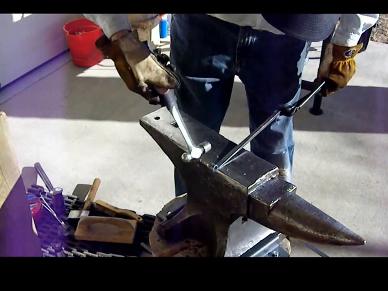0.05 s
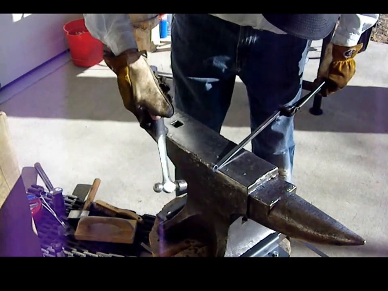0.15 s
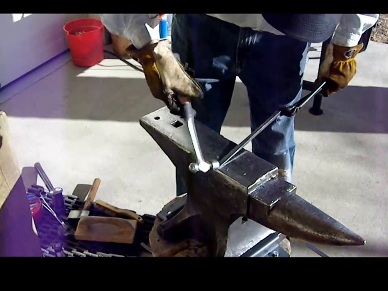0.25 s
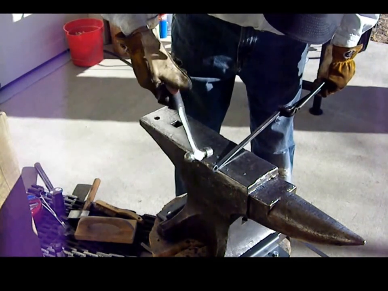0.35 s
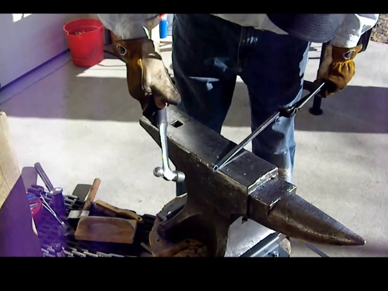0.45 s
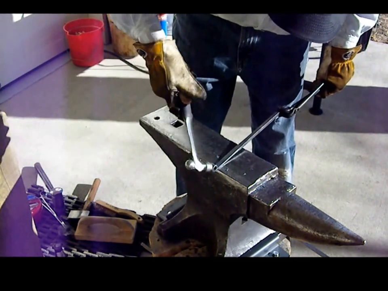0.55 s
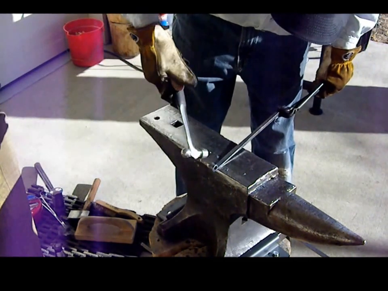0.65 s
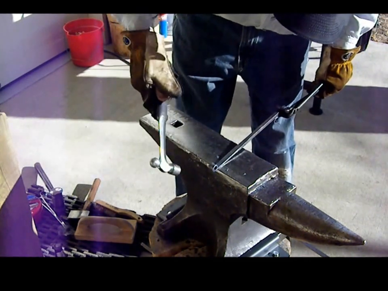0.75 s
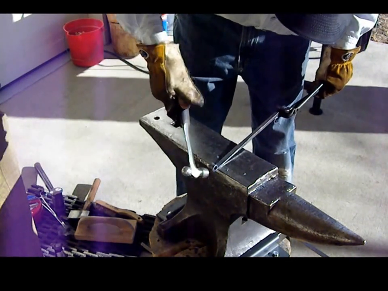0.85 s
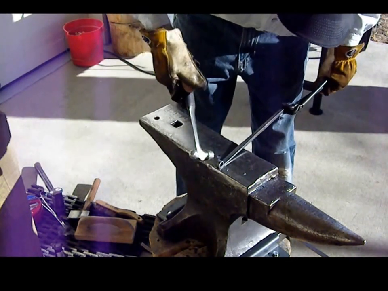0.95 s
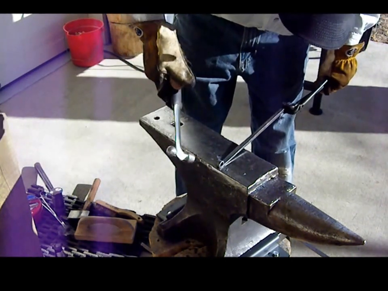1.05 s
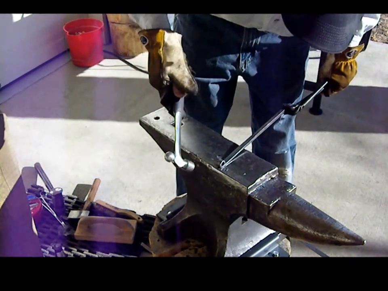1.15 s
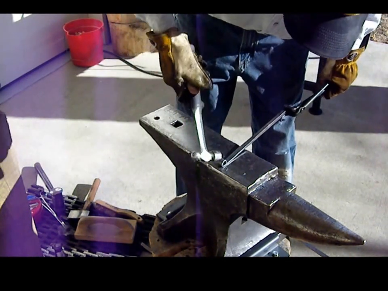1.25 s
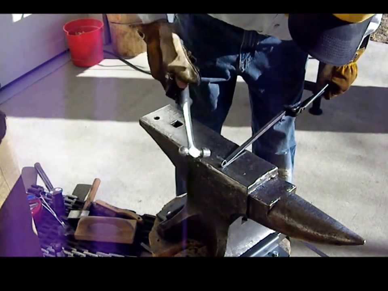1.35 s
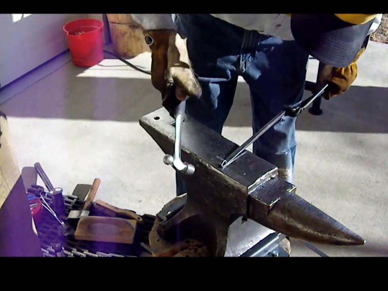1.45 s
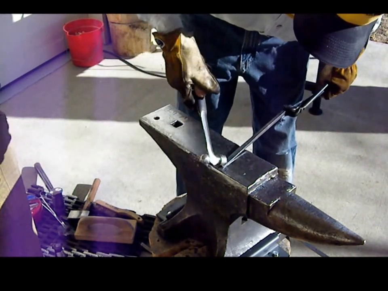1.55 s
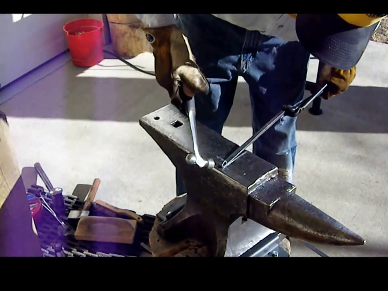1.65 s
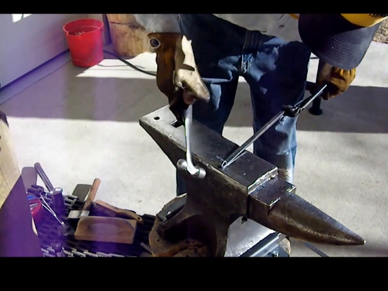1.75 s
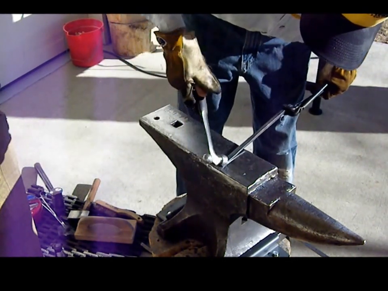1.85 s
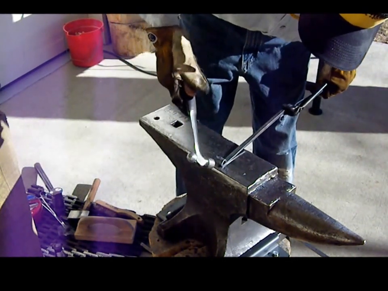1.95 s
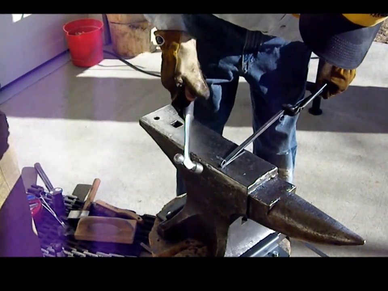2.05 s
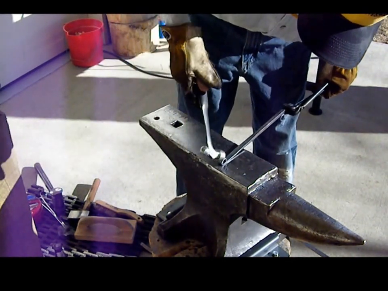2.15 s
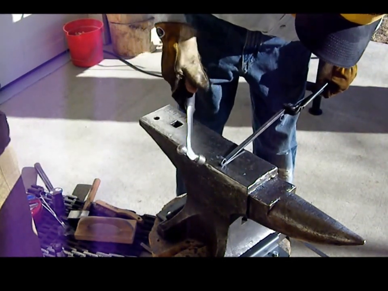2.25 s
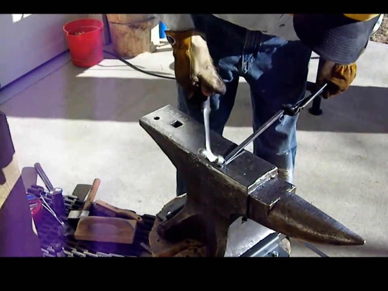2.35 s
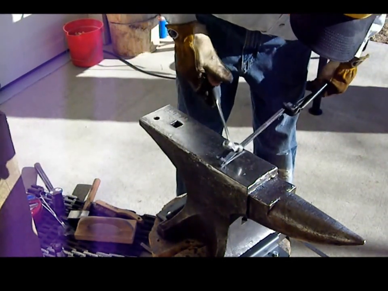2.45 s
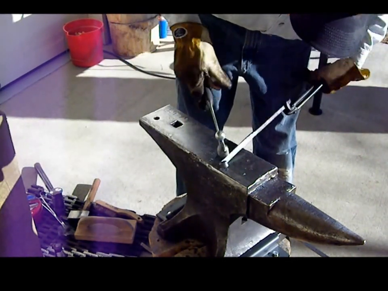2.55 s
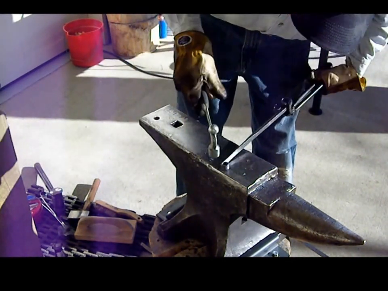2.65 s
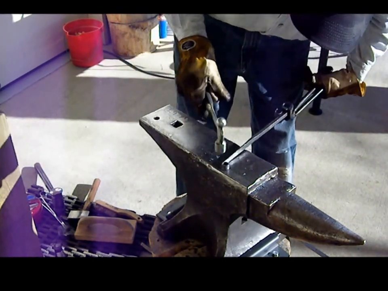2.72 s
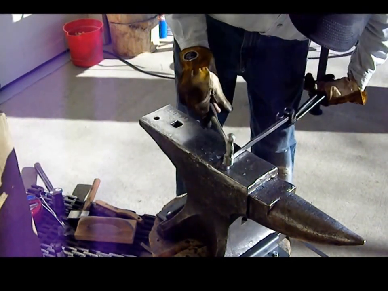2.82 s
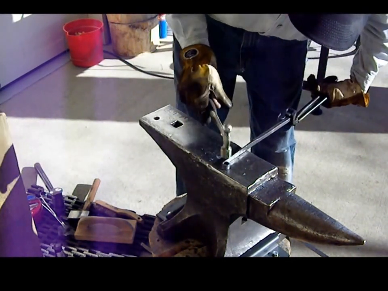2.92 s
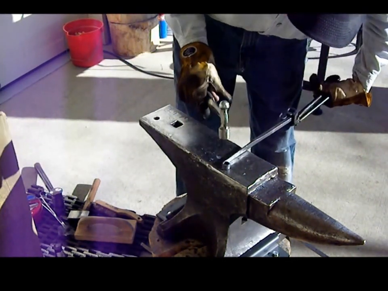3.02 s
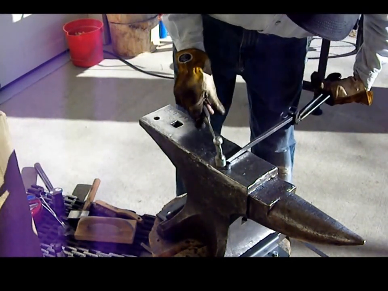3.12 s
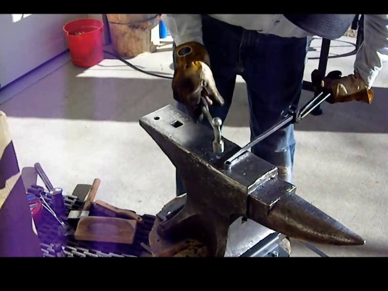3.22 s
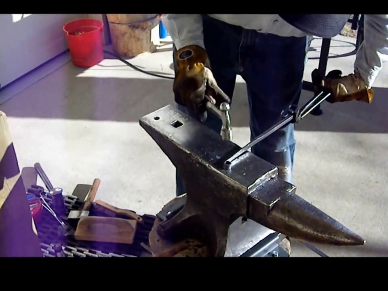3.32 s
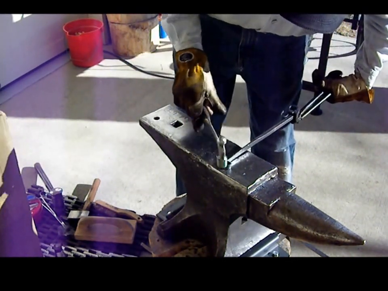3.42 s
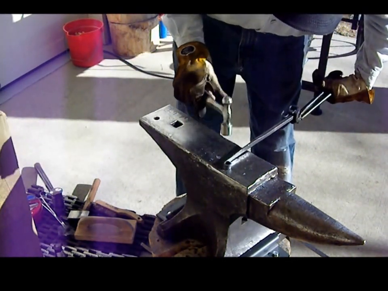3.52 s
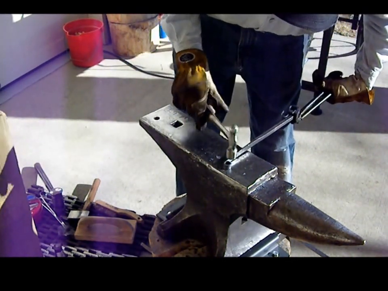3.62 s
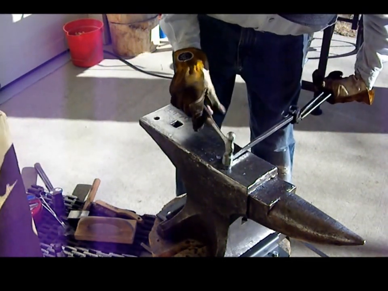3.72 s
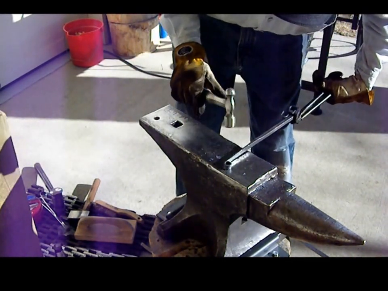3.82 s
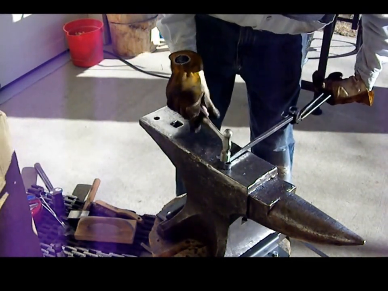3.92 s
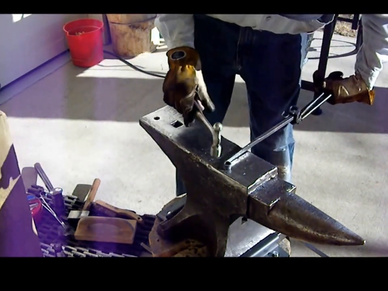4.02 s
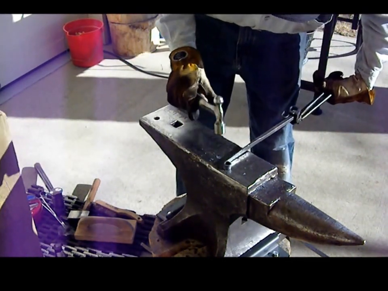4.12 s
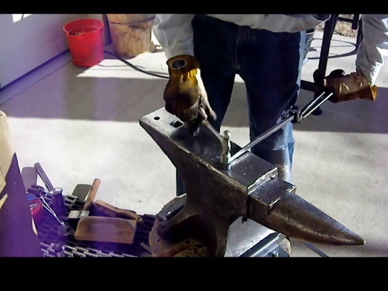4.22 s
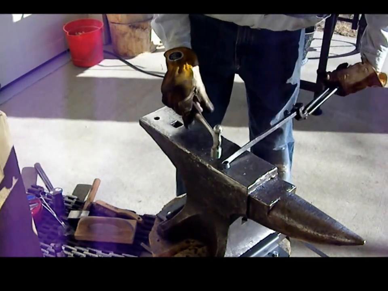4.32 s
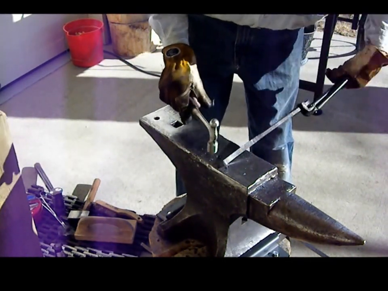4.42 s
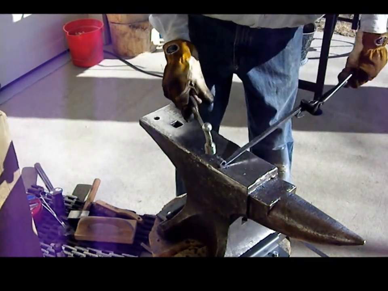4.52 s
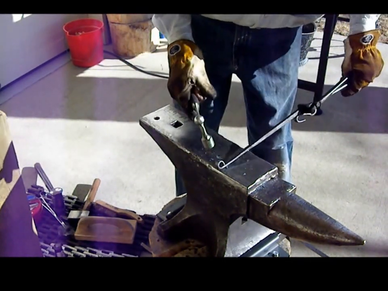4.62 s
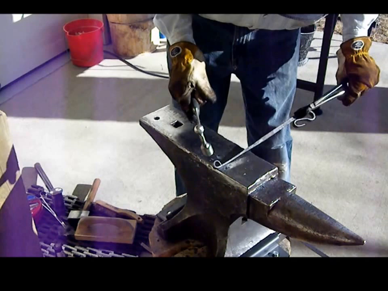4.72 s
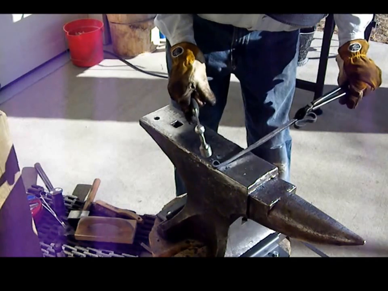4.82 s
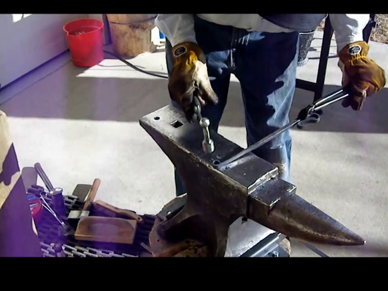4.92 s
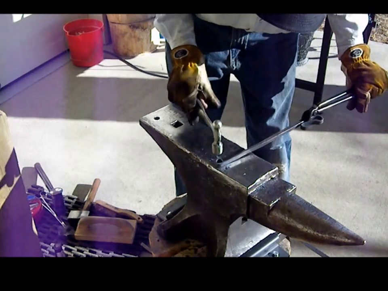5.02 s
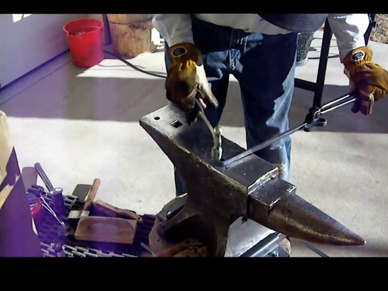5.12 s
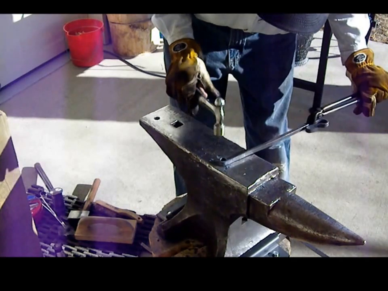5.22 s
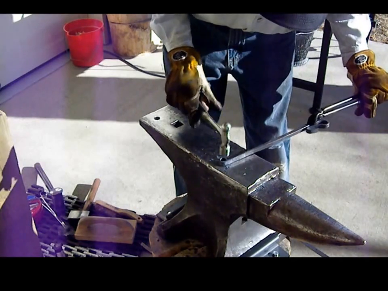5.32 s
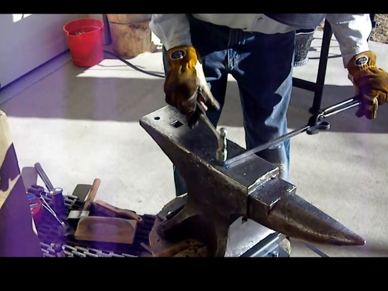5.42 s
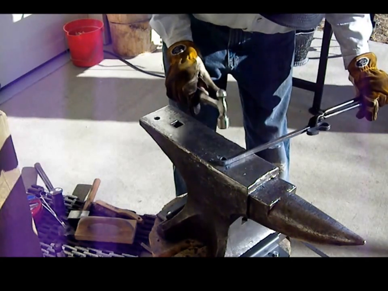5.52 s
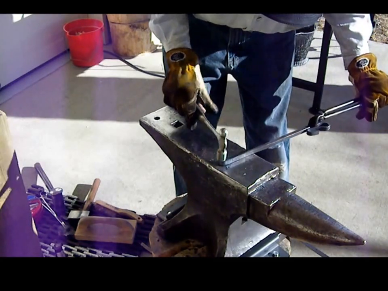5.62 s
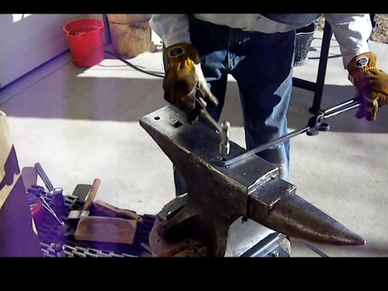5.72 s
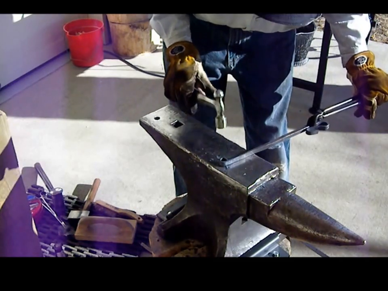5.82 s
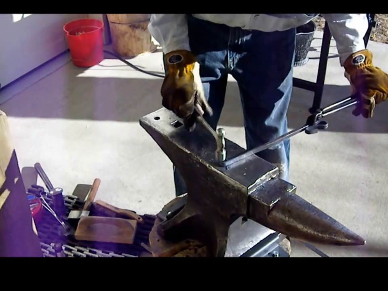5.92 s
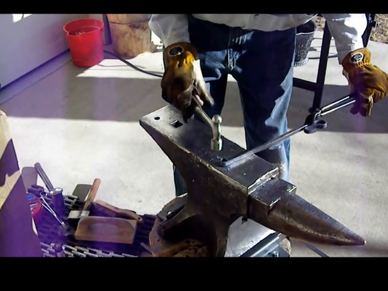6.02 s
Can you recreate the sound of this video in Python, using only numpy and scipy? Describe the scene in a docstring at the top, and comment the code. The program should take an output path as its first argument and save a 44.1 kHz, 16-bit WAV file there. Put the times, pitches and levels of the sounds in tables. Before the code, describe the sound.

A blow's ringing tail opens the sound, then a hand hammer pounds a steel bar on an anvil, close up, roughly every 0.3 seconds from 0.25 to 2.4. Each hit is a loud, hard crack with a brief metallic ping, varying from cushioned and dull to brighter and ringing. A light bouncing knock follows the blow at 0.9, and short bass thumps from microphone overload colour hits near 0.9, 1.2 and 5.4. Around 2.6 to 2.8 the bar shifts with small scratchy clicks. From 2.9 to 4.2 six blows fall, mostly more direct, with clear high anvil ringing. A pause follows with faint scraping near 4.6 and 4.9. A weak tap at 5.1 restarts the run, then strong blows at 5.4, 5.65 and 5.9, with a tiny bounce at 5.7. The concrete workshop gives a short dense echo; a soft forge rush continues throughout.

```python
"""A hand hammer flattens the end of a steel bar on an anvil, about three blows a second, with two light secondary
knocks. Each impact is a noise crack plus decaying sines for hammer head, stand and anvil; the more direct the
blow, the louder the anvil rings. A few strikes overload the microphone lopsidedly, heard as a short bass thump,
made as a damped sine. A concrete workshop echoes by convolution, a forge rushes softly as filtered noise, and
between runs the bar shifts in short bursts of noise. The close microphone saturates on its peaks."""
import sys
import numpy as np
from scipy import signal
from scipy.fft import rfft, irfft, next_fast_len
from scipy.io import wavfile
from scipy.ndimage import uniform_filter1d

SR = 44100
rng = np.random.default_rng(int(sys.argv[2]) if len(sys.argv) > 2 else 0)


def pcm_store(signal):
    """Save signal as 16-bit PCM."""
    levels = np.round(np.clip(np.atleast_2d(signal), -1, 1) * 32767)
    wavfile.write(sys.argv[1], SR, levels.astype(np.int16).T)


N = 267687
LEAD_S = 0.2  # time computed ahead of the first audible sample


def undb(db):
    """Amplitude ratio of a level: 20 dB for each factor of ten."""
    return 10 ** (np.asarray(db) / 20)


def unit(x):
    """Normalisation to an rms value of 1."""
    return x / np.sqrt(np.mean(x ** 2))


def fade(t, t60):
    """Exponential decay of a damped system, 60 dB down after t60."""
    return np.exp(-np.log(1000) * t / t60)


def along(points, hz, column=1):
    """Spectrum read from a table by linear interpolation on a log-frequency axis."""
    points = np.array(points)
    return np.interp(np.log(hz + 1), np.log(points[:, 0]), points[:, column])


def shaped(x, db_at):
    """Minimum-phase filtering: folding the cepstrum makes the gain db_at(Hz) causal."""
    size = next_fast_len(len(x) + 2048, True) // 2 * 2
    bins = np.fft.rfftfreq(size, 1 / SR)
    cepstrum = irfft(np.log(undb(db_at(bins))))
    cepstrum[1:size // 2] *= 2
    cepstrum[size // 2 + 1:] = 0
    response = np.exp(rfft(cepstrum))
    return irfft(rfft(x, size) * response)[:len(x)]


def ring(modes, t):
    """Modal superposition: a sum of damped sines from rows (f/Hz, level/dB, t60/s)."""
    return sum(undb(db) * fade(t, t60) * np.sin(2 * np.pi * hz * t) for hz, db, t60 in modes)


def add(track, s, sound):
    """Linear superposition of a sound on a track that begins LEAD_S early."""
    i = max(int((s + LEAD_S) * SR), 0)
    track[i:i + len(sound)] += sound[:len(track) - i]


def low_pass(x, hz):
    """Steep elliptic low-pass: passband ripple traded for a sharp cutoff."""
    return signal.sosfilt(signal.ellip(10, 0.2, 70, hz, fs=SR, output="sos"), x)


def crack(treble_db, hump_hz, hump_db, t60=0.02, snap=2.25, gain_db=25, hump_octaves=0.35):
    """Broadband impact: one hard snap, then milliseconds of crushed scale and chattering steel as noise."""
    # colour of the contact: (f/Hz, relative level/dB)
    contact_colour = [(50, -53.5), (140, -34), (215, -9.5), (480, -15), (700, -7), (1200, -16.5),
                      (2100, -13.5), (2900, -14.5), (4500, -11), (5600, -3.5), (7200, -2), (9400, -6.5),
                      (11800, -12), (13800, -6), (15300, -15)]
    t = np.arange(2048) / SR
    burst = rng.standard_normal(len(t)) * fade(t, t60)
    burst[0] = snap
    # level out the noise burst so that the colour below alone sets its spectrum
    power = np.abs(rfft(burst)) ** 2
    uneven_db = 10 * np.log10(uniform_filter1d(power, size=15))
    bins = np.fft.rfftfreq(len(t), 1 / SR)
    treble_share = along([(6500, 0), (10000, 1)], bins)
    colour_db = along(contact_colour, bins) + treble_db * treble_share
    # the way the bar lies on the face favours one broad band
    octaves_off = np.log2((bins + 1) / hump_hz)
    colour_db = colour_db + hump_db * np.exp(-(octaves_off / hump_octaves) ** 2)
    return undb(gain_db) * shaped(burst, lambda hz: np.interp(hz, bins, colour_db - uneven_db))


def hammer_ping(ping_hz, t, scatter=0.0062):
    """Free vibration of the hammer head: a few closely spaced, quickly damped modes."""
    # head modes: (f as a multiple of the ping, relative level/dB, t60/s)
    head_modes = [(.965, -1.5, .018), (0.996, 4, 0.032), (1.055, 4.5, 0.016), (1.115, -2.5, 0.025)]
    # the hammer never lands quite the same way twice
    head = [(ping_hz * ratio * (1 + scatter * rng.standard_normal()), db, t60)
            for ratio, db, t60 in head_modes]
    return ring(head, t)


def stand_knock(t):
    """Structure-borne excitation: the blow sets off low, damped modes of the stand under the anvil."""
    # stand modes: (f/Hz, level re force of blow/dB, t60/s)
    stand_modes = [(194, -39, .22), (246, -41, .2), (272, -42, .2), (330, -41, .2), (625, -36, .18),
                   (660, -34, .22), (699, -38, .2)]
    return ring(stand_modes, t)


def anvil_ring(heel, edge, t, bloom=1.0, bloom_s=0.0069, waver_db=2):
    """Modal excitation by place of blow; each tone blooms in the room and wavers as the smith moves."""
    # anvil modes: (f/Hz, relative level/dB, t60/s, extra level at heel/dB, extra level at edge/dB)
    anvil_modes = [ (473, -28, .63, 16, 2), (1568, -17, .5, 13.5, -1), (1637, 0, .78, -12, 0),
                   (1996, -10, .48, 8, 1), (1800, -9, 0.1, -10, 1), (2110, -7, 0.13, -11, -25),
                   (2140, -19.5, 0.11, -11, 21), (2275, -9, .42, -8, 0), (3300.5, -14, .52, 3, 6),
                   (3306.5, -12, .33, 5, 8), (3707, -17.5, .5, -8, 13), (4339.6, -18, 1.12, 0, 18),
                   (5396, -17, .25, 10, 0), (5442, -17, .2, 11, 0), (5508, -17, .33, 6, 0),
                   (5606, -7, .29, 3, 0), (5690, -13, .24, 7, 0), (6000, -19, 0.19, 1, 2),
                   (6229, -15, 0.16, 3, 3), (6560, -10, .22, 6, -15.5), (7440, -11, 0.27, 11, 7),
                   (9654, -10, .38, -12, 4), ]
    knots = np.linspace(0, 1, 14)  # s
    sound = np.zeros(len(t))
    for hz, db, t60, heel_db, edge_db in anvil_modes:
        tone = ring([(hz, db, t60)], t)
        gain = undb(heel * heel_db + edge * edge_db + waver_db * rng.standard_normal(len(knots)))
        sound += tone * np.interp(t, knots, gain)
    return sound * (1 - bloom * np.exp(-t / bloom_s))


def workshop(build_s=0.009):
    """Room impulse response: a few hard early reflections and a diffuse tail, each band with its own decay."""
    # reverberation: (f/Hz, t60/s, level re sound sent into the room/dB)
    tail_bands = [(97, 0.276, -26.5), (252, 0.31, 4.5), (731, 0.56, -4.5), (1640, 0.37, -1.5),
                  (4700, 0.39, -5.5), (9630, 0.26, -4), (14000, 0.24, -4.5)]
    # first reflections off floor and walls: (delay t/s, level re sound sent into the room/dB)
    reflections = [(.0042, -18.5), (0.0099, -14.5), (.012, -13), (0.0147, -11.5), (.0243, -20),
                   (0.035, -55)]
    size = SR // 2
    t = np.arange(size) / SR
    log_hz = np.log(np.fft.rfftfreq(size, 1 / SR) + 1)
    noise = rfft(rng.standard_normal(size))
    centres = np.log([row[0] for row in tail_bands])
    response = np.zeros(size)
    # each row of the identity matrix opens one band, overlapping its neighbours
    for share, (_, t60, db) in zip(np.eye(len(tail_bands)), tail_bands):
        swell = fade(t, t60) * (1 - np.exp(-(t / build_s) ** 2))
        band = irfft(noise * np.interp(log_hz, centres, share))
        response += undb(db) * band * swell / np.linalg.norm(swell)
    for delay, db in reflections:
        # clutter along the walls smears each echo over about a millisecond
        smear = rng.standard_normal(size=48)
        i = int(delay * SR * (1 + 0.02 * rng.standard_normal()))
        response[i:i + len(smear)] += undb(db) * smear / np.linalg.norm(smear)
    return response


def place(s):
    """Linear interpolation of the working spot on the face at a given time: (heel, edge)."""
    # working spot: (t/s, towards the heel/0-1, towards the edge/0-1)
    spots = [(.25, 0.36, .05), (.9, 0.22, 0.5), (1.25, 0.16, 0), (2.4, 0.1, 0), (3.3, 0, 0.81),
             (3.9, 0.14, 0), (4.202, 0.1, 0.83), (5.6, 0.3, 0.6), (5.95, 0, 0.6)]
    times, heel, edge = np.array(spots).T
    return np.interp(s, times, heel), np.interp(s, times, edge)


def strike(heel, edge, contact_db, ping_hz, clank_hz, ring_room_db=-11, stand_room_db=-6):
    """Superposition of one impact: crack, hammer ping, stand and anvil ring, convolved with the room for echo."""
    t = np.arange(SR) / SR
    treble_db, clank_db, ping_db, ring_db = contact_db
    contact = crack(treble_db, clank_hz, clank_db)
    ping = undb(ping_db) * hammer_ping(ping_hz, t[:len(contact)])
    steel = np.pad(contact + ping, (0, SR - len(contact)))
    stand = stand_knock(t)
    ringing = undb(ring_db) * anvil_ring(heel, edge, t)
    sent = steel + undb(stand_room_db) * stand + undb(ring_room_db) * ringing
    # the smith moves, so every strike meets a slightly different room
    echo = signal.fftconvolve(sent, workshop())[:SR]
    return steel + stand + ringing + echo


def blows(track):
    """Impact through a cushion: a direct blow is duller but clanks, pings and rings the anvil more."""
    # blows on the bar: (t/s, force/dB, directness/0-1, ping f/Hz, clank f/Hz)
    # directness 0: the bar cushions the blow; 1: it goes straight into the anvil
    # the clank is the band that the lie of the bar favours
    blow_list = [ (-.065, 1, 0.18, 5400, 3400), (.2495, -0.5, 0.36, 7000, 3550),
                 (0.5698, -1, 0, 6780, 9270), (0.885, -2, 0.74, 5480, 1500), (1.2336, -1, 0.58, 5700, 1430),
                 (1.532, 0, 0.65, 5570, 10400), (1.8195, -1.5, .32, 6410, 5500),
                 (2.1108, 0.5, .36, 5940, 1170), (2.3764, .5, 0.12, 6900, 9000),
                 (2.8576, -2.5, 0.16, 7000, 9800), (3.1228, 1, 0.82, 5950, 2030),
                 (3.3908, 0.5, 0.9, 5860, 2060), (3.6592, 1, .97, 5630, 2220),
                 (3.9374, -1, .46, 5520, 5630), (4.2157, 1.5, 0.95, 5820, 3620),
                 (5.084, -7, .1, 7200, 13500), (5.3608, 0, 0.52, 5340, 13500),
                 (5.6469, 0.5, 0.57, 5620, 3250), (5.9268, 2, 0.68, 6380, 2140), ]
    # contact at directness 0 and 1: (treble level/dB, clank level/dB, ping level/dB, anvil ring level/dB)
    cushioned = np.array((1.5, 0, -19, -38.5))
    direct = np.array((-3.5, 8, -12.5, -21.5))
    for s, force_db, directness, ping_hz, clank_hz in blow_list:
        contact_db = (1 - directness) * cushioned + directness * direct
        heel, edge = place(s)
        add(track, s, undb(force_db) * strike(heel, edge, contact_db, ping_hz, clank_hz))


def secondary_knocks(track):
    """Light secondary impacts: the hammer dropping on the bare face, then the bar bouncing."""
    # knocks: (t/s, force/dB, ping f/Hz, clank f/Hz, towards the heel/0-1)
    knock_list = [(0.9336, -13, 5785, 1930, 0.87), (5.6866, -21.5, 7330, 7240, 0.17)]
    # contact, the same for both: (treble level/dB, clank level/dB, ping level/dB, anvil ring level/dB)
    light_contact = (9, 18, 7.5, -9)
    for s, force_db, ping_hz, clank_hz, heel in knock_list:
        edge = place(s)[1]
        add(track, s, undb(force_db) * strike(heel, edge, light_contact, ping_hz, clank_hz))


def thumps(track, hz=50.4, t60=0.019):
    """Asymmetric overload of the microphone: a short bass thump, a damped sine over in a single cycle."""
    # thumps: (t/s, level/dB)
    thump_list = [(0.9343, -24), (1.2315, -21.5), (5.3607, -19.5)]
    thump = ring([(hz, 0, t60)], np.arange(SR) / SR)
    for s, db in thump_list:
        add(track, s, undb(db) * thump)


def forge(size, rush_db=-51.5, drone_db=-60, drone_hz=275, drone_width_hz=3.2):
    """Filtered noise: a soft, nearly steady rush with one low, narrow resonance."""
    # noise of the forge and the shop: (f/Hz, relative level per Hz/dB)
    shop_spectrum = [(18, -68), (30, -14), (213, -6), (277, -8), (379, -0.5), (518, -8), (709, -11),
                     (1360, -13.5), (1470, -14.5), (3590, -18), (4190, -20.5), (4660, -19.5), (7260, -15),
                     (8060, -19.5), (15500, -20)]

    def resonance_db(hz):
        """Resonance curve, 6 dB down one width from the centre."""
        return -20 * np.log10(1 + ((hz - drone_hz) / drone_width_hz) ** 2)

    rush = unit(shaped(rng.standard_normal(size), lambda hz: along(shop_spectrum, hz)))
    drone = unit(shaped(rng.standard_normal(size), resonance_db))
    waver_db = 0.3 * signal.resample(rng.standard_normal(size=60), size)
    return (undb(rush_db) * rush + undb(drone_db) * drone) * undb(waver_db)


def shifting(size):
    """Sliding friction: the bar slides in short runs of tiny slips, heard as coloured noise bursts."""
    # runs of slips: (t/s, length/s, level before colouring/dB)
    slip_runs = [(2.636, 0.011, -42), (2.757, 0.0069, -38), (2.762, 0.02, -30), (2.996, 0.017, -43),
                 (3.633, 0.0031, -27), (4.543, 0.0042, -45), (4.6, 0.082, -44.5), (4.929, 0.1, -49)]
    # colour of the scrape: (f/Hz, relative level/dB)
    scrape_colour = [(300, -24), (2500, -28), (4500, -17), (7000, -4), (9000, -13.5), (12000, -15),
                     (14500, -11)]
    track = np.zeros(size)
    for s, length, db in slip_runs:
        n = int(length * SR) + 2
        slips = rng.standard_normal(n) * undb(rng.exponential(size=n))
        add(track, s, undb(db) * unit(slips * np.hanning(n)))
    return shaped(track, lambda hz: along(scrape_colour, hz) + 5)


def scene():
    """Superposition of sources: anvil and bar close by, the room around them, the forge behind."""
    lead = int(LEAD_S * SR)
    size = N + lead
    hammering = np.zeros(size)
    blows(hammering)
    secondary_knocks(hammering)
    thumps(hammering)
    bar = shifting(size)
    bar = bar + signal.fftconvolve(bar, workshop())[:size]
    return (hammering + bar + forge(size))[None, lead:]


def record(dry, mic_top_hz=15400, bass_cut_hz=150, top_hz=16500):
    """Transducer limits: the microphone port carves dips, peaks saturate, deep bass and top are cut."""
    # dips of the microphone port: (f/Hz, half-width/Hz, level/dB)
    port_dips = [(7860, 110, -20), (8300, 150, -8), (12620, 200, -5)]

    def port_db(hz):
        """Sum of the bell-shaped dips."""
        return sum(db / (1 + ((hz - centre) / width) ** 2) for centre, width, db in port_dips)

    heard = low_pass(shaped(dry[0], port_db), mic_top_hz)
    heard = heard / (1 + heard ** 8) ** (1 / 8)  # overload: nearly linear until close to full scale
    heard = signal.sosfilt(signal.butter(1, bass_cut_hz, "high", fs=SR, output="sos"), heard)
    return low_pass(heard, top_hz)[None]


dry = scene()
out = record(dry)
pcm_store(out)
```